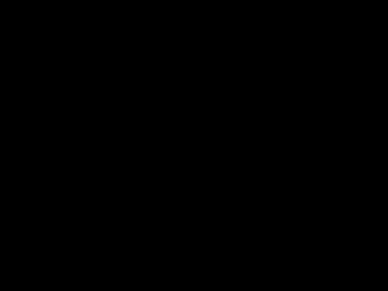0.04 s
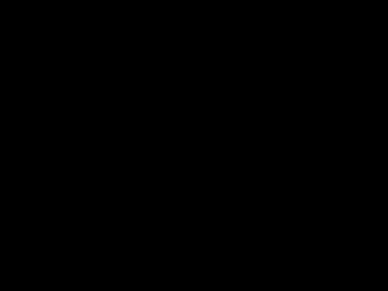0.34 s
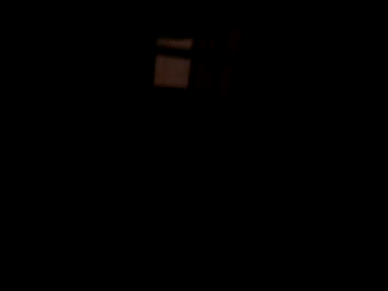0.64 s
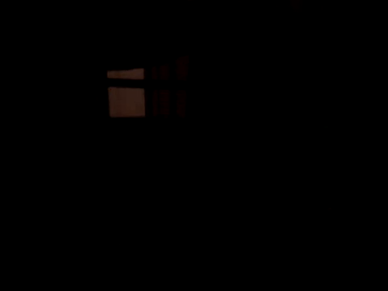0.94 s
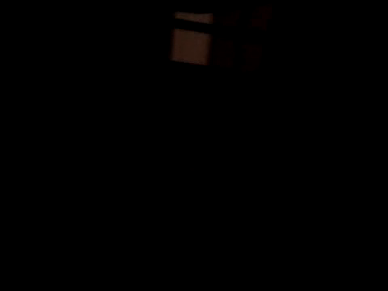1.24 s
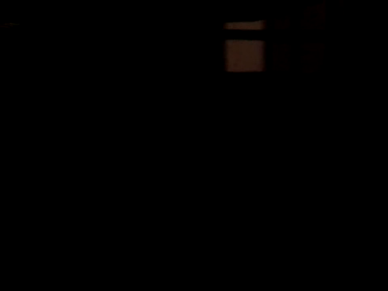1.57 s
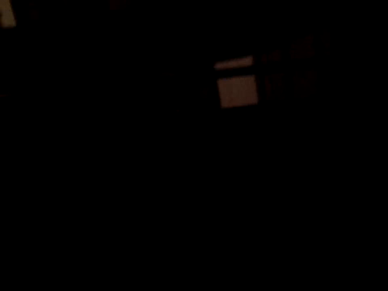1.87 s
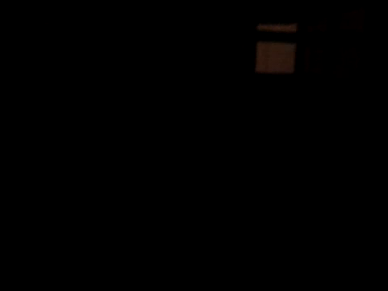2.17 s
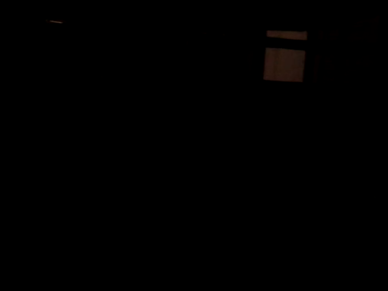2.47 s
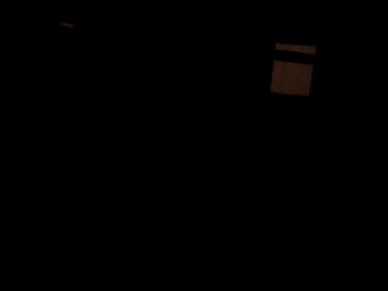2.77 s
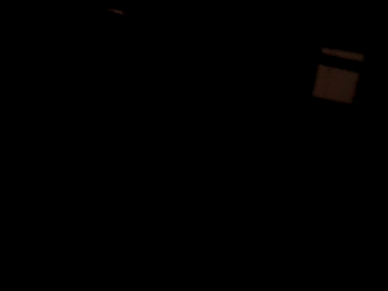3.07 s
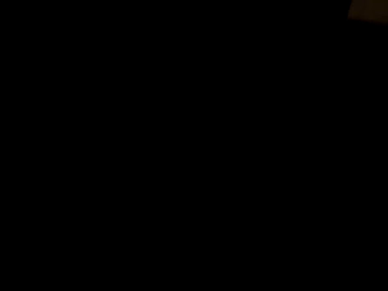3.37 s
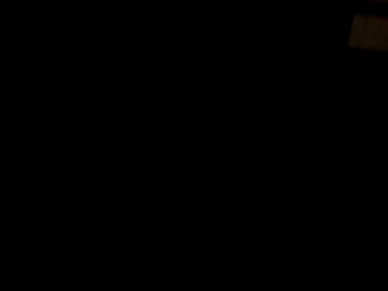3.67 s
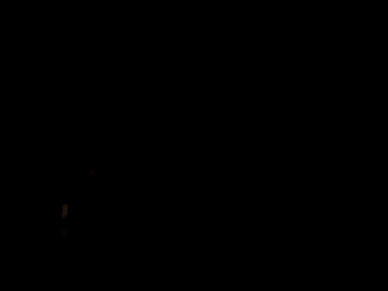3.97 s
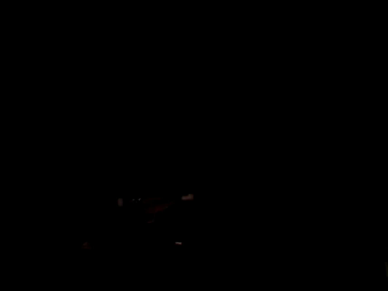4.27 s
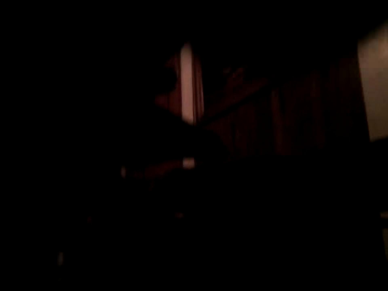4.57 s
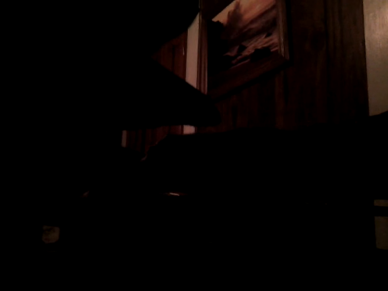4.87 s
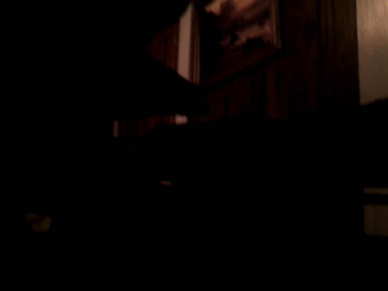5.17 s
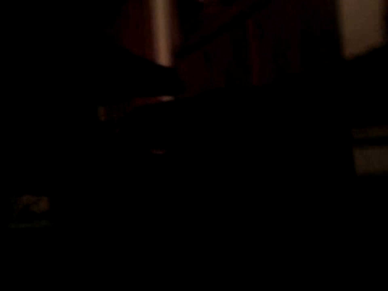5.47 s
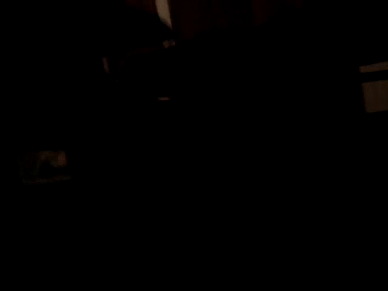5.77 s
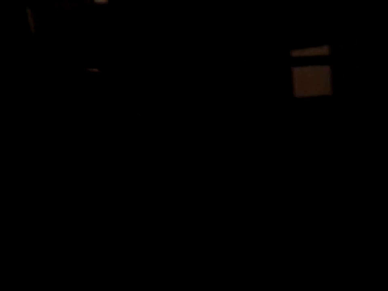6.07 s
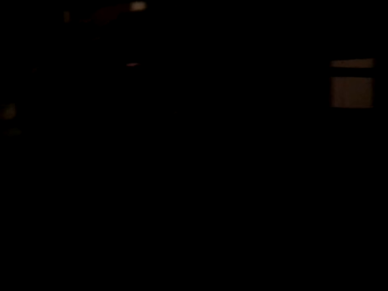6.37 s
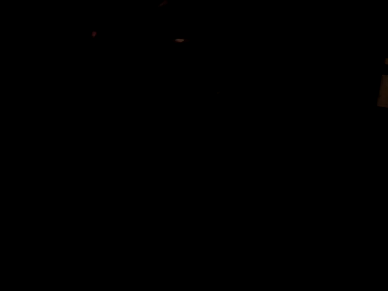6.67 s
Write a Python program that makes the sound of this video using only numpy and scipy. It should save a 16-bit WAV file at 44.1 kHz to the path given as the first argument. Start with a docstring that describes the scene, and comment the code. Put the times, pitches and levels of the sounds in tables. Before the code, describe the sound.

Close handling noise from a small camera: scuffs, ticks, soft thumps and two loud plastic clicks over faint room hiss.

```python
"""A quiet room: faint rumble, hiss and mains hum. A small camera is turned about in the hand.
Its electronics whine thinly and its lens motor hunts for focus. All reaches its one microphone
through the case: fingers glide, regrip, squeak, tick, tap and bump on the shell, the plastic snaps
sharply three times, and after one long drag of the palm the hand settles."""
import sys
import numpy as np
from scipy import signal
from scipy.fft import rfft, irfft, next_fast_len
from scipy.io import wavfile
from scipy.ndimage import map_coordinates

SR = 44100
rng = np.random.default_rng(int(sys.argv[2]) if len(sys.argv) > 2 else 0)


def materialize(psi):
    """Save the field psi as 16-bit PCM at rate SR to the path in sys.argv[1].

    A 1-D psi becomes a single channel; in a 2-D psi each row is a channel.
    """
    bounded = np.clip(np.atleast_2d(psi).T, -1, 1)
    quanta = np.round(bounded * 32767).astype(np.int16)
    wavfile.write(sys.argv[1], SR, quanta)


N = 296352

# room rumble and microphone hiss: f/Hz, level/dB
ROOM_SPECTRUM = [(20, -12), (35, -9), (58, -2), (90, 0), (150, -2), (260, -4), (500, -7.5), (1000, -11),
                 (2000, -13.5), (5000, -17), (10000, -17.5), (15500, -17.5)]
# mains hum partials: f/Hz, level/dB
HUM_PARTIALS = [(59.5, -71), (120, -65.5), (239.6, -70.5)]
# lens motor rasp: f/Hz, level/dB
MOTOR_SPECTRUM = [(2500, -14), (4200, -5), (4600, -6.5), (5050, -11), (9500, -14), (13000, -4), (15500, -1)]
# lens motor runs: start/s, end/s, level/dB
FOCUS_RUNS = [(0.616, 1.445, -55), (2.596, 2.764, -54.5), (2.98, 3.505, -58)]
# body shaken by the hand: f/Hz, level/dB
RUMBLE_SPECTRUM = [(25, -23), (55, -9), (115, 3), (230, -0.5), (400, -2), (540, -6.5), (800, -15),
                   (2000, -73)]
# skin rubbing the shell: f/Hz, level/dB
RUB_SPECTRUM = [(150, -25), (450, -2), (750, 0.5), (1150, 2), (1800, -1.5), (2700, -6), (4000, -11.5),
                (9000, -57)]
# friction hiss at the microphone port: f/Hz, level/dB
HISS_SPECTRUM = [(1000, -40), (2600, 6), (4500, 1.5), (6000, 3), (8000, 3.5), (10500, 1), (14000, 2.5),
                 (16000, -5)]
# grit of ticks and loose parts: f/Hz, level/dB
GRIT_SPECTRUM = [(150, -31), (600, -5.5), (1400, -4), (2800, -12.5), (4500, -11), (9000, -50)]
# fingertip glides: peak t/s, length/s, level/dB, centre f/Hz
GLIDES = [(0.194, 0.4, -62, 1370), (0.326, .11, -49, 1140), (0.706, .13, -39, 1160), (0.787, .14, -48, 874),
          (1.357, .16, -44.5, 1010), (3.776, .15, -45, 1240), (4.719, 0.19, -59, 1070),
          (5.299, 0.092, -59, 1800)]
# fingers take a new grip: peak t/s, length/s, level/dB, weight on the body/dB
REGRIPS = [(0.068, .045, -58.5, 9.5), (0.406, .04, -52, 6.5), (0.442, 0.038, -48.5, -2),
           (0.579, .1, -44, 5), (0.93, 0.039, -46.5, 3.5), (0.963, 0.068, -50, 6.5), (1.6, .022, -42, 4.5),
           (1.634, 0.068, -40.5, 1), (1.734, .13, -47, 10.5), (1.867, .07, -40.5, -1), (2.08, .12, -58, 6),
           (2.31, .025, -55, 16), (2.392, 0.092, -52, 13), (2.47, 0.095, -54, 4), (3.235, 0.076, -50.5, -2),
           (4.052, .085, -47.5, 1), (4.249, 0.034, -49.5, 5.5), (5.418, 0.041, -47, 5),
           (5.462, 0.1, -60.5, 10), (6.082, 0.06, -55, 2), (6.413, 0.034, -56.5, -2)]
# short gritty ticks, some landing with a tap or a snap: t/s, level/dB, treble over mid/dB
TICKS = [(0.439, -45.5, 15), (0.929, -41, 7.5), (1.2666, -36.5, -5), (1.5995, -39.5, -19),
         (1.6226, -37.5, 10.5), (1.7348, -25, -4), (1.857, -36, -11), (2.0745, -33.5, -9), (2.097, -38, -7),
         (2.2728, -30, -3), (2.4837, -32, -7), (2.5056, -52, 13.5), (2.8073, -37.5, -13),
         (2.9912, -34, -20), (3.0166, -37.5, -5.5), (3.037, -41.5, -2), (3.2301, -34.5, -13),
         (3.4456, -40.5, 6), (4.128, -30.5, 6), (4.397, -34, -11), (4.4353, -27.5, -7.5),
         (5.4147, -39.5, 2), (5.456, -43, -20), (5.5693, -60.5, 24), (5.6749, -46.5, -16), (6.088, -55, 16)]
# skin catches on the shell: t/s, level/dB, f/Hz, t60/s
SQUEAKS = [(.929, -34, 1058, 0.087), (0.959, -38, 1110, 0.057), (1.6236, -26, 1090, 0.022),
           (1.733, -29.5, 1620, 0.049), (6.074, -48.5, 1095, 0.069)]
# modes of the held body: f/Hz, level/dB
BODY_MODES = [(122, 0), (215, -1), (385, 1.5), (550, -8)]
# soft bumps of the hand: t/s, level/dB, centre f/Hz
BUMPS = [(1.187, -21.5, 230), (1.213, -29, 210), (1.257, -30, 256), (1.664, -29.5, 380),
         (1.7255, -21.5, 377), (2.274, -31.5, 470), (2.379, -29.5, 210), (2.424, -30, 224),
         (2.709, -23, 157), (2.973, -25.5, 139), (3.018, -40, 110), (3.4376, -21.5, 215),
         (4.1284, -33, 560), (5.43, -34.5, 346), (5.8327, -30.5, 348)]
# dry fingertip taps: t/s, level/dB, contact time/s
TAPS = [(0.2586, -30.5, 0.00038), (1.187, -15, 0.00033), (1.9861, -18, 0.00019), (2.0773, -15, 0.00019),
        (2.2739, -18.5, 0.00027), (2.506, -14, 0.00014), (3.253, -26.5, 0.00042), (4.086, -30.5, 0.0005),
        (5.7485, -19.5, 0.00029)]
# modes of the plastic shell: f/Hz, level/dB, t60/s
SHELL_MODES = [(875, -36, 0.027), (1485, -8.5, 0.0054), (2200, -3.5, 0.0028), (2810, -9, 0.003),
               (4350, 0.5, 0.0024), (6150, -4.5, 0.0036), (8150, -8.5, 0.0027), (11900, -20, 0.0016)]
# shell snaps: t/s, level/dB, pitch factor, treble/dB
SNAPS = [(3.3274, 1.5, 1.103, 1), (3.8549, 3.5, 1.123, -1.5), (4.1284, -16.5, 1.02, 3)]

GRIP_RIPPLE_DB = 3.5  # resonances that change with every grip
TURNING_END_S = 4.45  # camera nearly still from here on


def amp(db):
    """Decibels to gain."""
    return 10 ** (np.asarray(db) / 20)


def unit(x):
    """Scale to rms 1."""
    return x / np.sqrt(np.mean(x ** 2) + 1e-20)


def clock(size):
    """Sample times in s."""
    return np.arange(size) / SR


def add(track, start_s, sound):
    """Mix a sound into the track."""
    i = max(0, round(start_s * SR))
    track[i:i + len(sound)] += sound[:max(0, len(track) - i)]


def wobble(rate_hz, size):
    """Smooth random curve, rate_hz knots a second."""
    knots = rng.standard_normal(int(size * rate_hz / SR) + 4)
    return map_coordinates(knots, [clock(size) * rate_hz])


def coloured(x, spectrum, shift=1, ripple_db=0):
    """Filter x by a spectrum moved by the factor shift, plus random resonances; rms 1."""
    hz, db = np.transpose(spectrum)
    fft_size = next_fast_len(len(x))
    octave = np.log2(np.fft.rfftfreq(fft_size, 1 / SR) + 1)
    level_db = np.interp(octave, np.log2(hz * shift), db)
    ripple = np.interp(octave, np.linspace(0, 15, 120), rng.standard_normal(120))
    shaped = rfft(x, fft_size) * amp(level_db + ripple_db * ripple)
    return unit(irfft(shaped, fft_size)[:len(x)])


def friction(spectrum, grain_db, size, shift=1, ripple_db=0):
    """Dense tiny slips of unequal force, coloured by the case and the hollows of the grip."""
    slips = rng.standard_normal(size) * amp(grain_db * wobble(1500, size))
    return coloured(slips, spectrum, shift, ripple_db)


def ring(hz, t60_s, t):
    """One struck mode."""
    return np.sin(2 * np.pi * hz * t) * amp(-60 * t / t60_s)


def room_tone(level_db=-58):
    """Steady room rumble running into microphone hiss."""
    return amp(level_db) * coloured(rng.standard_normal(N), ROOM_SPECTRUM)


def mains_hum(flutter_db=1.6, drift_rad=0.64):
    """Mains partials, slightly unsteady in level and phase."""
    out, t = np.zeros(N), clock(N)
    for hz, db in HUM_PARTIALS:
        peak = np.sqrt(2) * amp(db + flutter_db * wobble(4.48, N))
        out += peak * np.sin(2 * np.pi * hz * t + drift_rad * wobble(2.5, N))
    return out


def whine(level_db=-55, tone_hz=11653.6, square_hz=25.9, jitter_rad=0.13):
    """Electronic tone; an uneven square wave flips its polarity and splits it into a comb of lines."""
    t = clock(N)
    tone = np.sin(2 * np.pi * tone_hz * t)
    flip_phase = 2 * np.pi * square_hz * t + jitter_rad * wobble(50, N)
    polarity = np.tanh(12 * np.sin(flip_phase))
    return amp(level_db) * tone * polarity


def focus_motor(ramp_s=0.056, unsteady_db=6.5):
    """Faint, uneven rasp and sizzle while the lens moves."""
    t = clock(N)
    drive = sum(amp(db) * np.clip(np.minimum(t - start_s, end_s - t) / ramp_s, 0, 1)
                for start_s, end_s, db in FOCUS_RUNS)
    flutter = amp(unsteady_db * wobble(35.04, N))
    return drive * flutter * friction(MOTOR_SPECTRUM, grain_db=3.5, size=N)


def sliding(level_db, weight_db, hiss_db, size, centre_hz=1170, narrowness=1.2):
    """Skin on the case: body rumble (weight_db) and port hiss (hiss_db), both relative to shell rub."""
    rub_centre_hz, widening_db, judder_db = 1240, 24, 1.6
    rumble = amp(weight_db) * friction(RUMBLE_SPECTRUM, grain_db=6, size=size)
    # a light, cupped hand narrows the rub to a hollow scrape; weight flattens it
    hollow = np.array(RUB_SPECTRUM) * [1, narrowness * np.exp(-weight_db / widening_db)]
    rub = friction(hollow, grain_db=2, size=size, shift=centre_hz / rub_centre_hz,
                   ripple_db=GRIP_RIPPLE_DB)
    hiss = amp(hiss_db) * friction(HISS_SPECTRUM, grain_db=3, size=size)
    judder = unit(amp(judder_db * wobble(130, size)))
    return amp(level_db) * judder * (rumble + rub + hiss)


def stroke(peak_s, length_s, db, rise_share, weight_db, hiss_db, centre_hz, narrowness):
    """One slide with a bell-shaped swell about peak_s."""
    out, rise_s = np.zeros(N), length_s * rise_share
    start_s = max(0, peak_s - 2 * rise_s)
    t = clock(24576) + start_s - peak_s
    width_s = np.where(t < 0, rise_s, length_s - rise_s)
    swell = np.exp(-2 * (t / width_s) ** 2)
    add(out, start_s, swell * sliding(db, weight_db, hiss_db, len(t), centre_hz, narrowness))
    return out


def fidget(level_db=-66, restless_db=4, settle_db=-9):
    """The holding hand never quite rests: a wandering rustle that drops once the turning ends."""
    calm_db = settle_db * (clock(N) > TURNING_END_S)
    wander_db = restless_db * wobble(9, N)
    return sliding(level_db + calm_db + wander_db, weight_db=6, hiss_db=0, size=N)


def glides():
    """Light, smooth fingertip slides: mostly hollow rub."""
    return sum(stroke(peak_s, length_s, db, rise_share=0.53, weight_db=-7.5, hiss_db=-19.5,
                      centre_hz=hz, narrowness=1.43)
               for peak_s, length_s, db, hz in GLIDES)


def regrips(lighten_db=2.5):
    """Fingers shift: short, hissing scuffs with a quick onset."""
    return sum(stroke(peak_s, length_s, db, rise_share=0.28, weight_db=weight_db - lighten_db,
                      hiss_db=-3, centre_hz=1200, narrowness=1.5)
               for peak_s, length_s, db, weight_db in REGRIPS)


def smears(lag_s=0.02, length_s=0.14, below_db=31.5):
    """The hand slides a little with each bump, louder the harder it lands."""
    return sum(stroke(at_s + lag_s, length_s, db - below_db, rise_share=0.33, weight_db=8,
                      hiss_db=-4.5, centre_hz=950, narrowness=1.36)
               for at_s, db, _ in BUMPS)


def palm_drag(start_s=4.1, firmest_s=4.395, end_s=4.47, land_s=0.057, lift_s=0.032):
    """Even hiss; rub and rumble grow as the palm presses harder, until it lets go."""
    firmest_db, hiss_db, press_db_per_s, ease_db_per_s = -41, -48, 80, 90
    t = clock(N)
    contact = np.clip(np.minimum((t - start_s) / land_s, (end_s - t) / lift_s), 0, 1)
    offset_s = np.clip(t, start_s, end_s) - firmest_s
    level_db = firmest_db + np.minimum(press_db_per_s * offset_s, -ease_db_per_s * offset_s)
    return contact * sliding(level_db, weight_db=1, hiss_db=hiss_db - level_db, size=N,
                             centre_hz=1200, narrowness=1.3)


def ticks(t60_s=0.015, stray_count=22, stray_db=-50):
    """Short, gritty ticks, some landing with a tap or a snap; faint strays fall at random while the camera
    turns."""
    out, t = np.zeros(N), clock(2048)
    strays = [(at_s, stray_db + rng.normal(), 0) for at_s in TURNING_END_S * rng.random(stray_count)]
    for at_s, db, treble_db in list(TICKS) + strays:
        # a tick too light to move the shell sounds higher
        shift = np.interp(treble_db, [6, 13], [1, 2.15])
        grit = amp(db) * friction(GRIT_SPECTRUM, grain_db=2.5, size=len(t), ripple_db=GRIP_RIPPLE_DB)
        fizz = amp(db + treble_db) * friction(HISS_SPECTRUM, grain_db=-2.5, size=len(t), shift=shift)
        add(out, at_s, (grit + fizz) * amp(-60 * t / t60_s))
    return out


def squeaks(flutter_db=1.6):
    """Skin catches on the shell: brief, unsteady stick-slip tones."""
    out, t = np.zeros(N), clock(4096)
    for at_s, db, hz, t60_s in SQUEAKS:
        add(out, at_s, amp(db + flutter_db * wobble(210, len(t))) * ring(hz, t60_s, t))
    return out


def bumps(rolloff_db_per_oct=8, detune=0.054, decay_cycles=13.5, rattle_db=-20):
    """Each bump favours the body modes nearest its centre pitch; the grip retunes them each time and the case
    rattles."""
    attack_s, punch, punch_s = 0.001, 0.8, 0.006
    press_lead_s, press_db, press_hz = 0.025, -40, 189  # soft push just before each snap
    out, t = np.zeros(N), clock(8192)
    # the first swing is the largest, then the hand damps the body
    push = (1 - np.exp(-t / attack_s)) * (1 + punch * np.exp(-t / punch_s))
    presses = [(at_s - press_lead_s, db + press_db, press_hz) for at_s, db, _, _ in SNAPS]
    for at_s, db, centre_hz in list(BUMPS) + presses:
        t60_s = decay_cycles / centre_hz
        thud = np.zeros(len(t))
        for hz, mode_db in BODY_MODES:
            octaves_off = abs(np.log2(hz / centre_hz))
            gripped_hz = hz * np.exp(detune * rng.normal())
            thud += amp(mode_db - rolloff_db_per_oct * octaves_off) * ring(gripped_hz, t60_s, t)
        rattle = amp(rattle_db - 60 * t / t60_s) * friction(RUMBLE_SPECTRUM, grain_db=25, size=len(t))
        add(out, at_s, amp(db) * (thud + rattle) * push)
    return out


def taps(bluntness=1.52, rebound=0.64, lag_contacts=1.38, width_contacts=2.57):
    """A fingertip pushes the microphone once; the case springs back more slowly."""
    out, lead_s = np.zeros(N), 256 / SR
    t = clock(1024) - lead_s
    for at_s, db, contact_s in TAPS:
        contacts = t / contact_s
        push = np.exp(-abs(contacts) ** bluntness)
        spring_back = rebound * np.exp(-((contacts - lag_contacts) / width_contacts) ** 2)
        add(out, at_s - lead_s, amp(db) * (push - spring_back))
    return out


def snaps(buzz_db=-38, buzz_t60_s=0.029, treble_hz=4000, low_cut_hz=260):
    """The shell lets go at once: its modes ring briefly and loose parts buzz faintly."""
    out, t = np.zeros(N), clock(2048)
    for at_s, db, pitch, treble_db in SNAPS:
        modes = sum(amp(mode_db + treble_db * (hz > treble_hz)) * ring(hz * pitch, t60_s, t)
                    for hz, mode_db, t60_s in SHELL_MODES)
        grit = coloured(rng.standard_normal(len(t)), GRIT_SPECTRUM)
        buzz = amp(buzz_db - 60 * t / buzz_t60_s) * grit
        add(out, at_s, amp(db) * (modes + buzz))
    # the snaps carry little deep bass
    return signal.sosfilt(signal.butter(1, low_cut_hz, "highpass", fs=SR, output="sos"), out)


def scene():
    """One microphone feeds both channels."""
    knocks = snaps() + taps() + bumps() + squeaks() + ticks()
    rubbing = glides() + regrips() + smears() + palm_drag() + fidget()
    background = focus_motor() + room_tone() + mains_hum() + whine()
    mono = knocks + rubbing + background
    return np.array([mono, mono])


def record(dry):
    """The input clips on the snaps, blocks the deepest bass and is band-limited."""
    low_cut_hz, top_hz = 48, 15700
    clipped = np.clip(dry, -1, 1)
    thinned = signal.sosfilt(signal.butter(3, low_cut_hz, "highpass", fs=SR, output="sos"), clipped)
    passband = np.fft.rfftfreq(N, 1 / SR) < top_hz
    return irfft(rfft(thinned) * passband, N)


dry = scene()
out = record(dry)
materialize(out)
```